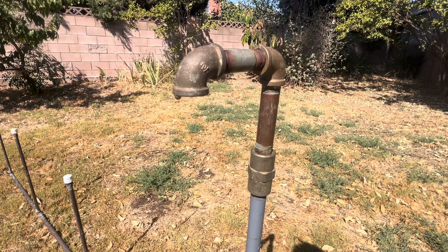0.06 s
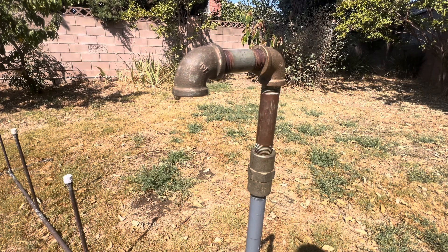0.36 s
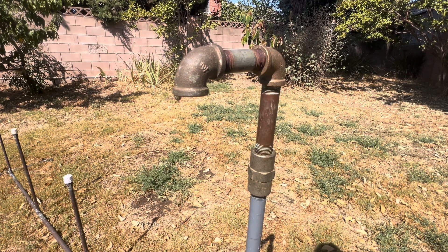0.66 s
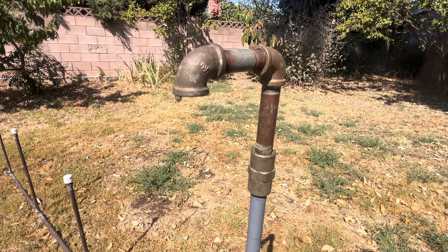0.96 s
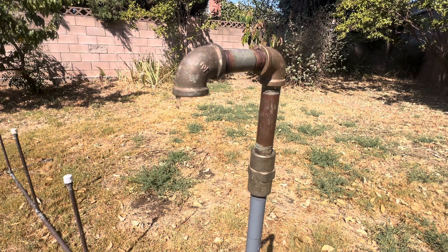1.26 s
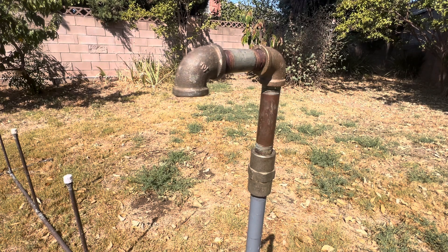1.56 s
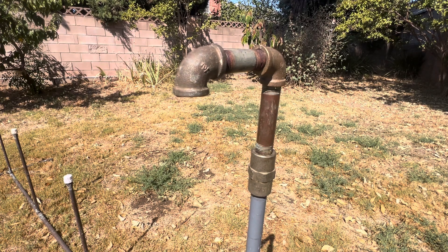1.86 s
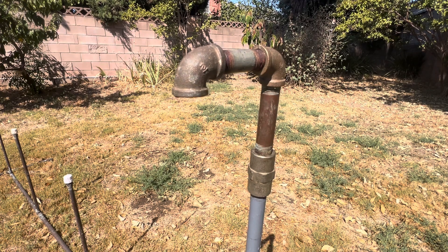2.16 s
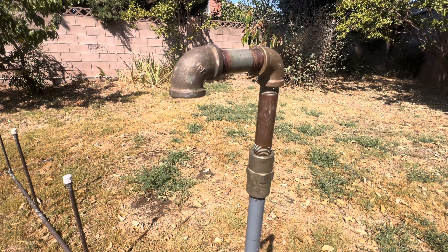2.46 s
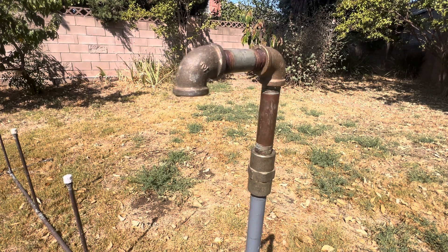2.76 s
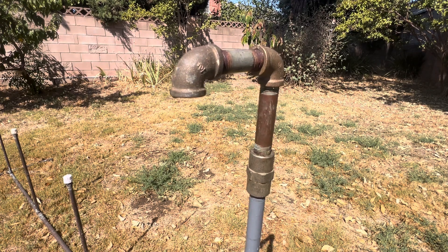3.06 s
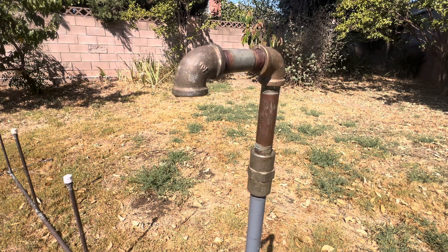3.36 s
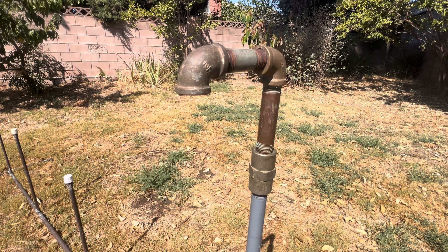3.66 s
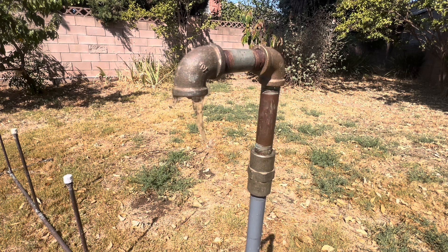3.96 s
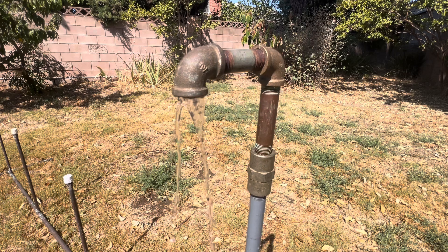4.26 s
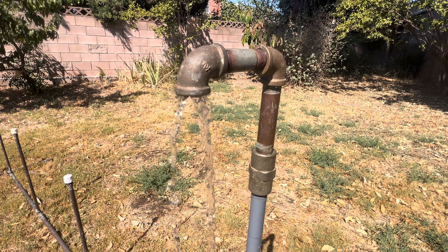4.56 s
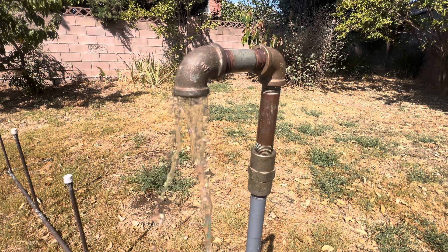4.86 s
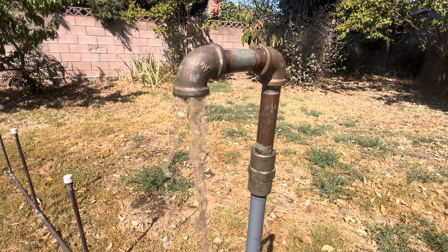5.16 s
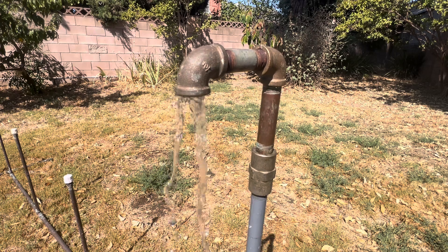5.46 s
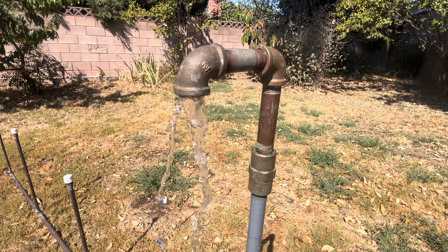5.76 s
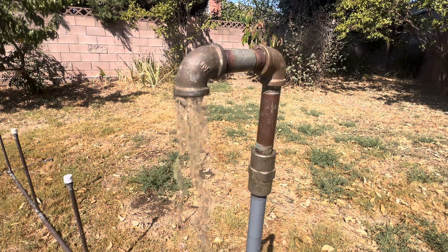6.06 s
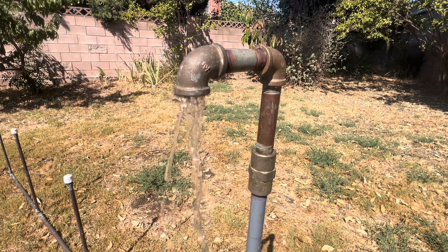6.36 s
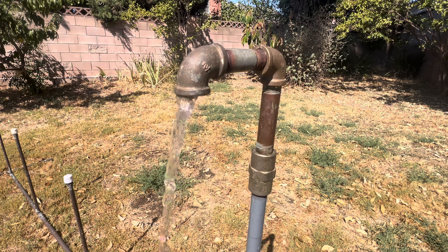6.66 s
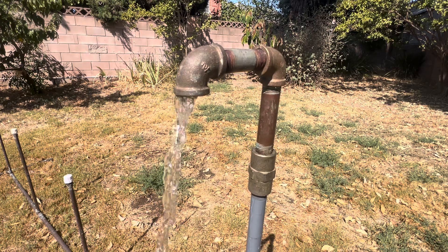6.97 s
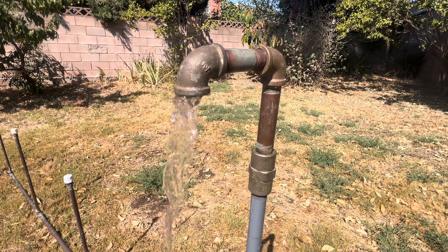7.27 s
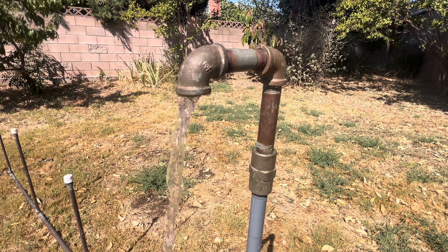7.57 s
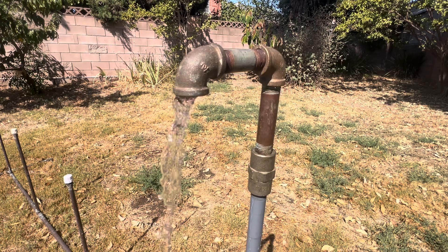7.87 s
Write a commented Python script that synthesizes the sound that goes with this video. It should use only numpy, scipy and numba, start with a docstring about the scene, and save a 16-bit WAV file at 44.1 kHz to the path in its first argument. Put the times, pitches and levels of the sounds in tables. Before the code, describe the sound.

Air hisses from a garden pipe, then water sputters out with a high squeal that drops to a low whistle, splattering on dry ground.

```python
"""A quiet yard: distant rumble, a machine hum, small birds and a brief rustle. Then a garden standpipe
is turned on. Air hisses out through the flow valve and rings the metal pipe. Water follows, its
turbulence driving a resonance that squeals in uneven surges, then drops to a low whistle as the line
runs full. The stream breaks into blobs that splatter on dry ground."""
import sys
import numpy as np
from scipy import signal
from scipy.fft import rfft, irfft
from scipy.io import wavfile
from scipy.ndimage import uniform_filter1d
from numba import njit

SR = 44100
rng = np.random.default_rng(int(sys.argv[2]) if len(sys.argv) > 2 else 0)


def int16_out(signal):
    """Quantize to a 16-bit WAV file."""
    q = np.round(np.clip(np.atleast_2d(signal).T, -1, 1) * 32767)
    wavfile.write(sys.argv[1], SR, q.astype(np.int16))


N = 358091
T = np.arange(N) / SR

CRACK_S, OPEN_S = 3.175, 3.368  # valve cracks, is open
ARRIVE_S, STREAM_S = 4.19, 4.84  # water reaches the spout, streams
PURGE_S, FULL_S = 6.36, 6.57  # last air leaves, pipe is full


def undb(db):
    """Decibels to gain."""
    return 10 ** (np.asarray(db) / 20)


def unit(x):
    """Scale to rms 1."""
    return x / np.sqrt(np.mean(np.abs(x) ** 2))


def ramp(start_s, end_s):
    """Linear rise from 0 to 1, held at both ends."""
    return np.clip((T - start_s) / max(end_s - start_s, 1 / SR), 0, 1)


def swell(centre_s, half_width_s):
    """Gaussian bump of height 1."""
    return np.exp(-((T - centre_s) / half_width_s) ** 2)


def blend(a, b, share):
    """From a to b as share goes from 0 to 1."""
    return a + (b - a) * share


def curve(points):
    """Interpolate (time_s, value) points at every sample."""
    return np.interp(T, *np.transpose(points))


def noise():
    """White noise."""
    return rng.standard_normal(N)


def walk(rate_hz):
    """Smooth random drift up to about rate_hz; rms 1."""
    lowpass = np.exp(-(np.fft.rfftfreq(N, 1 / SR) / rate_hz) ** 2)
    return unit(irfft(rfft(noise()) * lowpass, N))


def colour(x, spectrum):
    """Minimum-phase filter through (freq_hz, gain_db) points; output rms 1."""
    hz, db = np.transpose(spectrum)
    size = 4096
    bin_db = np.interp(np.log(np.fft.rfftfreq(size, 1 / SR) + 1), np.log(hz), db)
    cepstrum = irfft(np.log(undb(bin_db)))
    cepstrum[1:size // 2] *= 2
    cepstrum[size // 2 + 1:] = 0
    impulse = irfft(np.exp(rfft(cepstrum)))
    return unit(signal.fftconvolve(x, impulse)[:N])


@njit
def svf(x, g, k):
    """State-variable band-pass with tuning g and damping k; gain 1 at the centre."""
    y, band_state, low_state = np.empty(len(x)), 0., 0.
    for i in range(len(x)):
        v = (band_state + g[i] * (x[i] + 1e-18 - low_state)) / (1 + g[i] * (g[i] + k[i]))
        band_state = 2 * v - band_state
        low_state += 2 * g[i] * v
        y[i] = k[i] * v
    return y


def band(x, hz, width_hz):
    """One resonance; centre and width may move."""
    ones = np.ones(len(x))
    return svf(x, np.tan(np.pi * hz / SR) * ones, width_hz / hz * ones)


def narrow_noise(hz, width_hz):
    """Turbulence through the same resonance twice, at constant power."""
    once = band(noise(), hz, width_hz)
    return unit(band(once, hz, width_hz) / np.sqrt(width_hz))


def ring(drive, modes):
    """Resonances, each stirred by its own turbulence under a common drive."""
    return unit(sum(undb(db) * band(drive * noise(), hz, width_hz) for hz, width_hz, db in modes))


# Rumble spectrum: freq_hz, gain_db
RUMBLE_SPECTRUM = [(20, -20), (40, -5), (60, 0.5), (100, -9), (200, -14.5), (400, -20.5), (900, -19.5),
                   (1600, -26.5), (3000, -37), (5000, -43.5), (16000, -55)]
# Machine hum lines: pitch_hz, gain_db
HUM_LINES = [(55, -71), (70, -60.5), (140, -62.5), (296, -62), (592, -69.5)]


def yard(quiet_db=-58.5, steady_db=-52.5):
    """Distant rumble and a wavering machine hum grow together, then hold."""
    db = blend(quiet_db, steady_db, ramp(.7, 2.76))
    hum = sum(undb(gain_db + 2.2 * walk(3.9)) * np.sin(2 * np.pi * hz * T + 1.05 * walk(2.4))
              for hz, gain_db in HUM_LINES)
    rumble = colour(noise(), RUMBLE_SPECTRUM) * undb(db + 0.47 * walk(8))
    return rumble + hum * undb(db - steady_db + 1)


# Low thuds: centre_s, half_width_s, level_db
THUD_SWELLS = [(1.477, 0.095, -50), (1.78, 0.11, -52.5), (2.852, 0.34, -50.5), (4.53, 0.045, -47.5),
               (6.418, 0.06, -39)]


def thuds():
    """Soft low swells of rumble."""
    return sum(narrow_noise(55, 39) * swell(s, width_s) * undb(db) for s, width_s, db in THUD_SWELLS)


# Bird chirps: start_s, length_s, start_hz, middle_hz, end_hz, level_db
BIRD_CHIRPS = [(0.016, 0.062, 3560, 3650, 4070, -63), (0.03, 0.047, 4550, 4230, 3650, -66),
               (0.204, 0.06, 4760, 4100, 3550, -65), (0.433, 0.077, 3560, 3970, 3820, -65),
               (0.453, .035, 4200, 4370, 4200, -69), (.6, 0.054, 4700, 4900, 3280, -65),
               (.75, 0.091, 3350, 2940, 3520, -67), (0.934, 0.074, 3250, 3530, 2720, -61.5),
               (1.148, .075, 2900, 3580, 2820, -61), (1.311, 0.038, 4800, 4080, 3700, -61),
               (1.374, 0.055, 4270, 4100, 3240, -59), (1.65, 0.047, 2550, 3100, 3230, -71),
               (2.105, .03, 3400, 3480, 3600, -72), (2.38, .045, 4700, 4200, 5500, -72),
               (2.94, .048, 3580, 3400, 4450, -67), (2.977, .04, 4440, 3400, 2900, -68)]


def birds(rough_db=4, echo_db=-5, echo_decay_s=0.066, warble=.012):
    """Quick arched chirps and one thin buzzing call, scattered by wall and trees."""
    chirps, tremble = np.zeros(N), walk(330)
    for start_s, length_s, *arch_hz, db in BIRD_CHIRPS:
        u = np.linspace(0, 1, int(length_s * SR))
        hz = np.polyval(np.polyfit([0, .5, 1], arch_hz, 2), u) * (1 + warble * tremble[:len(u)])
        envelope = undb(db) * np.sqrt(np.abs(np.sin(np.pi * u)))
        i = int(start_s * SR)
        chirps[i:i + len(u)] += envelope * np.sin(2 * np.pi * np.cumsum(hz) / SR)
    buzz_db = curve([(2.87, -110), (2.885, -67), (2.95, -67), (3.03, -71), (3.05, -95), (3.15, -110)])
    buzz = colour(noise(), [(6000, -60), (6750, -26), (7100, -2), (7600, -15), (8600, -9),
                            (9200, -26), (10000, -48)])
    calls = chirps * undb(rough_db * walk(200)) + buzz * undb(buzz_db)
    tail = noise() * np.exp(-T / echo_decay_s)
    echo = signal.fftconvolve(calls, tail / np.sqrt(np.sum(tail ** 2)))[:N]
    return calls + undb(echo_db) * echo


# Rustle swells: centre_s, half_width_s, level_db
RUSTLE_SWELLS = [(0.344, 0.31, -69.5), (1.01, 0.59, -66.5), (1.23, 0.039, -62.5), (1.436, 0.03, -53.5),
                 (1.54, 0.19, -65), (2, .022, -66)]
# Rustle spectrum: freq_hz, gain_db
RUSTLE_SPECTRUM = [(40, 10), (200, 0.5), (1200, 9), (3000, 3), (7000, -4), (11000, -8.5), (15500, -13)]
# Dry ticks: start_s, peak_db, centre_hz
DRY_TICKS = [(.44, -54, 4500), (.521, -54, 6000), (1.399, -44, 4000), (1.445, -53, 3500),
             (1.615, -56, 9000), (1.633, -44, 1860), (1.778, -49, 12000)]


def rustle(tick_decay_s=.0018):
    """A soft dry rustle with a few sharper ticks."""
    stir = np.sqrt(sum((undb(db) * swell(s, width_s)) ** 2 for s, width_s, db in RUSTLE_SWELLS))
    out = colour(noise() * undb(2 * walk(150)), RUSTLE_SPECTRUM) * stir
    t = T[:SR // 20]
    for start_s, peak_db, hz in DRY_TICKS:
        tick = band(rng.standard_normal(len(t)) * np.exp(-t / tick_decay_s), hz, 0.87 * hz)
        i = int(start_s * SR)
        out[i:i + len(t)] += undb(peak_db) * tick / np.abs(tick).max()
    return out


# Heaviest blobs landing: time_s
HARD_SLAPS_S = [5.231, 5.33, 6.168, 6.859, 7.161, 7.411, 7.49, 7.992]


def slap_envelope(rate_hz=72, spread_db=4, decay_s=0.0019, hard_db=15):
    """The stream breaks into blobs that land at uneven intervals."""
    gap_draw, size_draw = rng.random((1200, 2)).T
    at = (np.cumsum(.15 - .85 * np.log(gap_draw)) * SR / rate_hz).astype(int)
    size = undb(spread_db * np.sqrt(12) * size_draw)
    energy = np.bincount(at[at < N], size[at < N] ** 2, N)
    energy[(np.array(HARD_SLAPS_S) * SR).astype(int)] += undb(hard_db) ** 2
    power = signal.lfilter([1], [1, -np.exp(-2 / (decay_s * SR))], energy)
    return unit(np.sqrt(power))


def plinks(count=1000, lowest_hz=1900):
    """Tiny trapped bubbles ring briefly, rising in pitch."""
    out, t = np.zeros(N), T[:SR // 50]
    for when, pitch, size in rng.random((count, 3)):
        cycles = lowest_hz * 2.5 ** pitch * t * (1 + 4 * t)
        i = int(when * (N - len(t)))
        out[i:i + len(t)] += undb(20 * size) * np.exp(-cycles / 3) * np.sin(2 * np.pi * cycles)
    return unit(out)


# Splat spectrum: freq_hz, gain_db
SPLAT_SPECTRUM = [(200, -4.5), (700, -5.5), (2500, 2), (5000, 4), (8000, 0.5), (9200, 3), (10800, -2.5),
                  (13500, -2), (16000, -23)]


def splatter(level_db=-40, plink_gain_db=-7, rise_s=1.34, lull_db=-2):
    """Blobs slap dry ground and trap bubbles, softening briefly as the strands merge into one stream."""
    spray = undb(1.5 * walk(3000))
    splat = colour(noise() * slap_envelope() * spray, SPLAT_SPECTRUM)
    landing = ramp(ARRIVE_S, ARRIVE_S + rise_s) * undb(level_db + lull_db * swell(6.7, .5))
    return (splat + undb(plink_gain_db) * plinks()) * landing


# Pipe rush spectrum: freq_hz, gain_db
RUSH_SPECTRUM = [(100, -18), (250, -1), (450, -4.5), (900, 6.5), (1700, 0.5), (2500, -2.5), (4500, 2),
                 (6600, 7), (8000, -6.5), (9300, -1), (10800, -5.5), (13500, -4), (16000, -5)]
# Full-pipe modes: freq_hz, width_hz, gain_db
FULL_PIPE_MODES = [(119, 21, -3), (242, 29, -8), (360, 77, -3.5), (3637, 150, 5.5), (4000, 420, -3.5),
                   (3180, 310, -3.5), (6460, 64, 3)]


def water(rush_db=-42, sizzle_db=-43.5, part_full_db=-53, full_db=-38.5, strain_db=3):
    """Bubbly flow rushes in the pipe and rings it; the valve's sizzle deepens as the stream gathers."""
    stream = ramp(ARRIVE_S, STREAM_S) ** 1.6
    gathered = ramp(5.5, FULL_S) ** 2
    strain = undb(strain_db * swell(6.13, 0.49))  # forcing out the last air
    churn = undb(1.07 * walk(95))
    flow = stream * strain * churn
    rush = colour(noise() * churn, RUSH_SPECTRUM) * stream * strain * undb(rush_db)
    sizzle = narrow_noise(hz=blend(6080, 4370, gathered), width_hz=blend(1400, 2000, np.sqrt(gathered)))
    sizzle *= flow * undb(sizzle_db) * (1 - ramp(6.89, 7.83))
    ringing = ring(undb(2 * walk(160)), FULL_PIPE_MODES)
    ringing *= stream * undb(blend(part_full_db, full_db, gathered ** 2))
    return rush + sizzle + ringing


def filling(start_hz=1150, end_hz=480, settle_s=0.4, note_db=-52.5, fundamental_db=-60):
    """The spout's hollow fifth harmonic sinks and settles over its fundamental until the pipe is full."""
    hz = blend(end_hz, start_hz, np.exp(-np.maximum(T - 4.55, 0) / settle_s))
    note = narrow_noise(hz, 97) * undb(note_db) + narrow_noise(hz / 5, 24) * undb(fundamental_db)
    return note * ramp(4.56, 5.15) * (1 - ramp(PURGE_S, FULL_S))


# Air spurts and chokes: centre_s, half_width_s, gain_db
AIR_SPURTS = [(3.43, 0.17, 6), (3.69, 0.033, 5), (4.042, 0.061, 10), (4.148, 0.074, 2), (4.33, 0.05, -4),
              (4.426, 0.019, 7.5), (4.64, 0.072, 5)]


def air_flow(crack_db=-55, open_db=-39.5, fade_db_per_s=68):
    """Gains in dB of the hiss and its top octave: it opens, spurts, brightens with spray and drowns."""
    db = blend(crack_db, open_db, ramp(CRACK_S, OPEN_S) ** 1.6)
    db -= fade_db_per_s * np.maximum(T - STREAM_S, 0)
    db += sum(gain_db * swell(s, width_s) for s, width_s, gain_db in AIR_SPURTS)
    top_db = curve([(3.73, -2.5), (3.77, -0.5), (4.53, -0.5), (4.625, -4.5)])  # dry, spray, muffled
    return db, top_db


# Valve jet spectrum: freq_hz, gain_db
JET_SPECTRUM = [(600, -32), (1300, -13), (2200, -7.5), (3500, -6), (5000, -7.5), (6800, -3.5), (8600, -6),
                (10000, -6), (14000, -3.5), (16000, -8)]
# Air modes, empty pipe: freq_hz, width_hz, gain_db
EMPTY_PIPE_MODES = [(2140, 16, -5), (2650, 16, -3), (3370, 19, -2.5), (3880, 35, -1.5), (4560, 87, -20),
                    (5490, 15, 2), (6260, 21, 4), (6680, 41, 2.5), (6620, 36, -9), (7240, 47, 0),
                    (7760, 130, -4), (7800, 48, -8), (9630, 160, -1)]
# Air modes, water advancing: freq_hz, width_hz, gain_db
WET_PIPE_MODES = [(3357, 14, 6.5), (3936, 28, 0.5), (5300, 26, -23), (7050, 14, 7), (6840, 100, -5),
                  (7730, 58, -0.5), (9100, 44, -17), (9620, 110, 1), (10220, 57, -3), (11500, 43, 1),
                  (11700, 62, -6), (13000, 89, 2.5)]


def air(ring_gain_db=-3, flutter_db=1.8, scatter_s=.005):
    """The valve jet hisses through the pipe's many modes, which change as water advances."""
    db, top_db = air_flow()
    decay = np.exp(-T[:SR // 10] / scatter_s)
    advance = ramp(3.65, 4)
    hiss = 0
    for modes, share in ((EMPTY_PIPE_MODES, 1 - advance), (WET_PIPE_MODES, advance)):
        # scattered reflections make dense weak modes; water damps the strong ones
        jet = signal.fftconvolve(noise(), rng.standard_normal(len(decay)) * decay)[:N]
        ringing = ring(1, modes) * undb(ring_gain_db) * (1 - ramp(4.39, 4.65))
        hiss += np.sqrt(share / 2) * (colour(jet, JET_SPECTRUM) + ringing)
    top = signal.sosfiltfilt(signal.butter(2, 9000, "high", fs=SR, output="sos"), hiss)
    low = signal.sosfiltfilt(signal.butter(4, 2700, fs=SR, output="sos"), hiss)
    hiss -= low * (1 - ramp(3.27, 3.37))  # no low hiss from a barely open valve
    hiss += (undb(top_db) - 1) * top
    return hiss * undb(db + flutter_db * walk(38))


# Squeal strength: time_s, gain_db
SQUEAL_CURVE = [(4.34, -66), (4.41, -39), (4.42, -46.5), (4.65, -27), (4.99, -31.5), (5.22, -23),
                (5.52, -23.5), (6.05, -21), (6.5, -22)]
# Air pockets bending the whistle: centre_s, half_width_s, bend_hz, gain_db
AIR_POCKETS = [(4.899, 0.076, -85, 0.5), (7.04, 0.064, -7, -3), (7.229, 0.092, 82, 5)]


def whistle_flow(start_hz=726, squeal_hz=1627.5, low_hz=634, low_db=-36.3,
                 squeal_sag_hz_per_s=67, low_sag_hz_per_s=45, climb_db_per_s=13.5):
    """Whistle pitch, whistle level and gargle level as water displaces the air."""
    purged = ramp(PURGE_S, FULL_S) ** 1.92
    # the air column shortens steadily; pitch goes as 1 / length
    high_hz = 1 / blend(1 / start_hz, 1 / squeal_hz, ramp(3.5, 4.24))
    high_hz -= squeal_sag_hz_per_s * np.maximum(T - ARRIVE_S, 0)
    hz = blend(high_hz, low_hz - low_sag_hz_per_s * (T - FULL_S), purged)
    climb_db = -56.5 + climb_db_per_s * np.minimum(T - ARRIVE_S, 0)
    squeal_db = curve(SQUEAL_CURVE) - 0.65
    high_db = np.where(T < ARRIVE_S, climb_db, np.maximum(climb_db, squeal_db))
    db = blend(high_db, low_db, purged ** 2)
    for centre_s, width_s, bend_hz, gain_db in AIR_POCKETS:
        pocket = swell(centre_s, width_s)
        hz += bend_hz * pocket
        db += gain_db * pocket
    gargle_gain_db = blend(-22.5, -8.5, ramp(ARRIVE_S, PURGE_S))
    gargle_gain_db = blend(gargle_gain_db, -18, purged ** 2)
    return hz, db, db + gargle_gain_db


# Clean whistle surges: centre_s, level_db, length_s, pitch_hz
WHISTLE_SURGES = [(4.402, -34.5, .007, 1620), (4.643, -25, 0.016, 1647), (4.707, -21.5, 0.0076, 1584),
                  (4.897, -21, 0.0062, 1494), (5.061, -22.5, 0.0057, 1520), (5.183, -17.5, .01, 1593),
                  (5.207, -18, 0.011, 1600), (5.228, -16, 0.0069, 1485), (5.278, -18.5, 0.014, 1485),
                  (5.425, -16, 0.0077, 1563), (5.615, -16, 0.0052, 1470), (5.908, -14.5, .0043, 1480),
                  (5.952, -19.5, .0086, 1526), (6.022, -14.5, 0.01, 1484), (6.068, -12.5, 0.01, 1512),
                  (6.094, -15, 0.0048, 1590), (6.324, -16, 0.0096, 1580), (6.35, -10.5, .0025, 1580),
                  (6.509, -16, 0.0044, 1140), (7.175, -25.5, 0.013, 640), (7.23, -21, 0.0057, 722),
                  (7.724, -27.5, 0.014, 586), (7.805, -25, 0.0098, 564)]


def whistle(wander=0.023, glug_db=3.5):
    """Turbulent flow drives one resonance that warbles, gargles and locks into brief clean surges."""
    hz, db, gargle_db = whistle_flow()
    tone = narrow_noise(hz * (1 + wander * walk(25)), 105 + 0.03 * hz)
    power = uniform_filter1d(tone ** 2, SR // 100)
    tone = unit(tone / (power + .1) ** .16)  # strong swings limit themselves
    fullness = np.interp(hz, [700, 1400], [1, 0])
    spill = narrow_noise(1.207 * hz, 450) * undb(-24 + 15 * fullness)  # turbulence above the pitch
    glug = undb(glug_db * fullness * np.tanh(narrow_noise(26, 14)))  # air pockets in the full pipe
    tone = (tone + spill) * glug * undb(db)
    for centre_s, surge_db, length_s, surge_hz in WHISTLE_SURGES:
        near = np.abs(T - centre_s) < 3 * length_s
        t = T[near] - centre_s
        lock = np.exp(-(t / (0.72 * length_s)) ** 2)
        clean = np.sqrt(2) * undb(surge_db) * np.sin(2 * np.pi * (surge_hz * t + rng.random()))
        tone[near] = blend(tone[near], clean, lock)
    gargle = narrow_noise(0.82 * hz, 160 + 0.22 * hz) * undb(gargle_db + 2 * walk(61))
    return tone + gargle


def scene():
    """Mono mix beside the pipe, which is silent until the valve cracks."""
    pipe = (air() + whistle() + water() + splatter() + filling()) * (T > CRACK_S)
    return (pipe + thuds() + birds() + rustle() + yard())[None]


def record(dry):
    """Band-limit to 36 Hz - 15.8 kHz."""
    dry = signal.sosfilt(signal.butter(2, 36, "high", fs=SR, output="sos"), dry)
    return signal.sosfilt(signal.ellip(10, .2, 80, 15800, fs=SR, output="sos"), dry)


dry = scene()
out = record(dry)
int16_out(out)
```